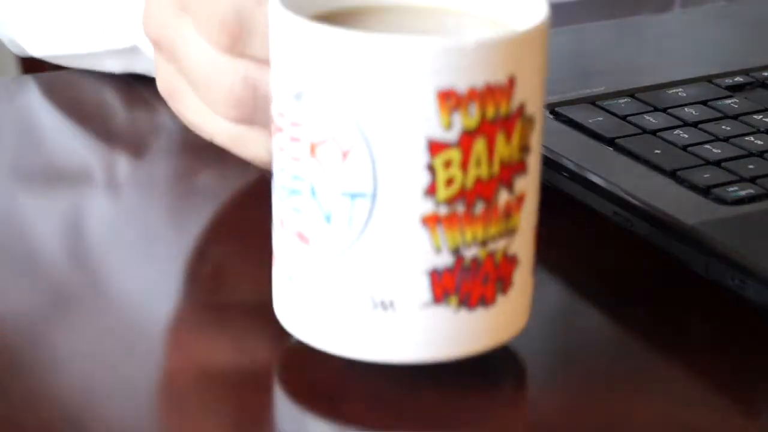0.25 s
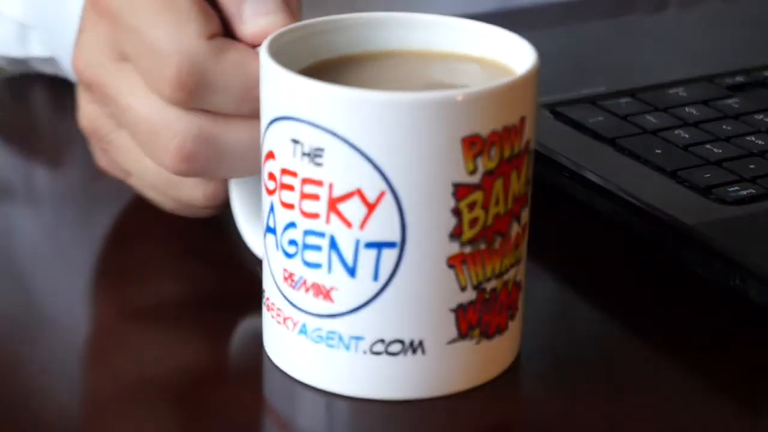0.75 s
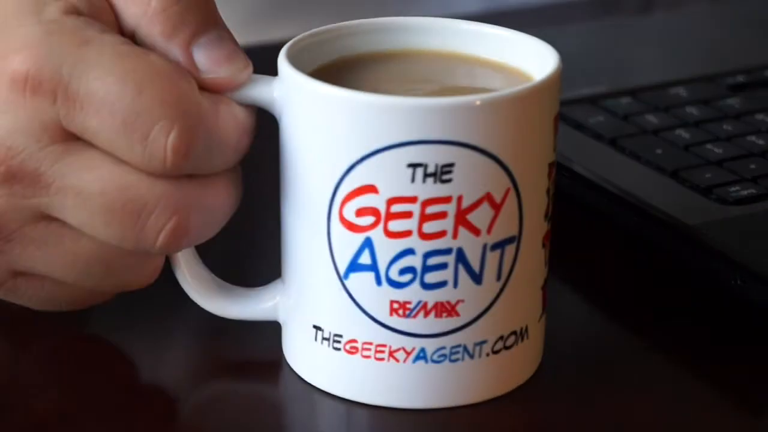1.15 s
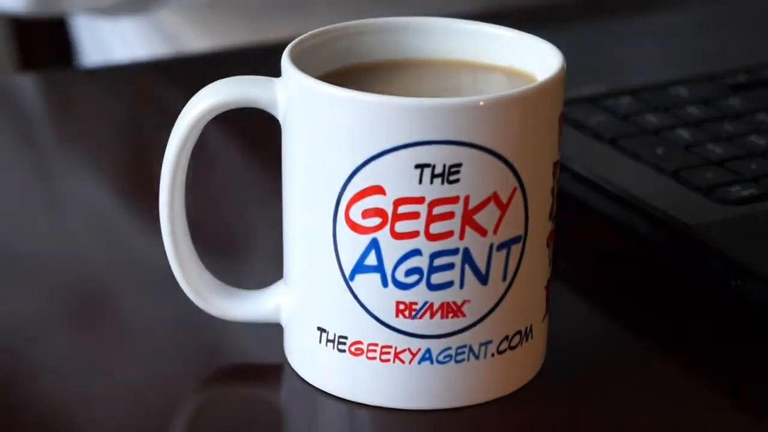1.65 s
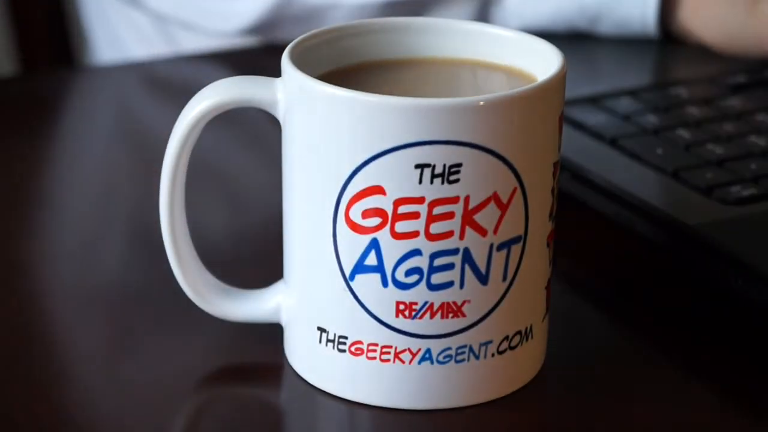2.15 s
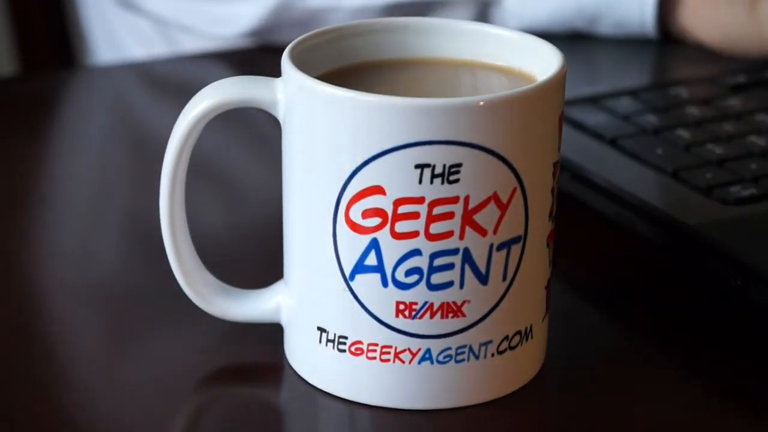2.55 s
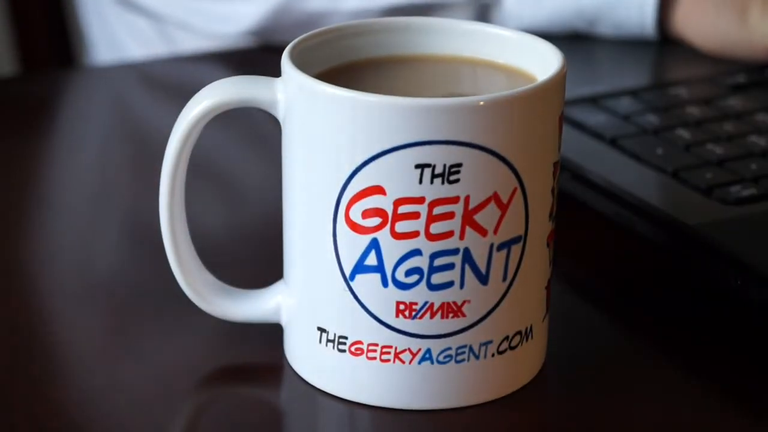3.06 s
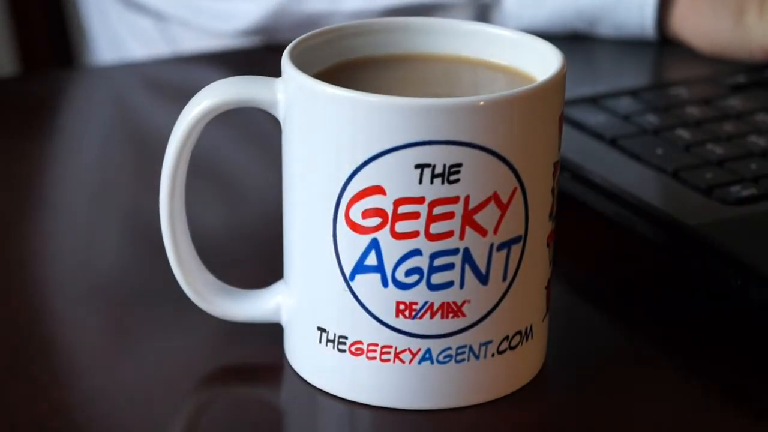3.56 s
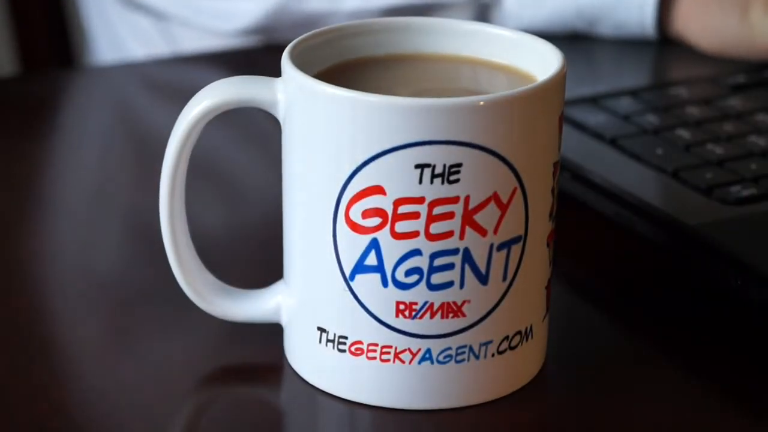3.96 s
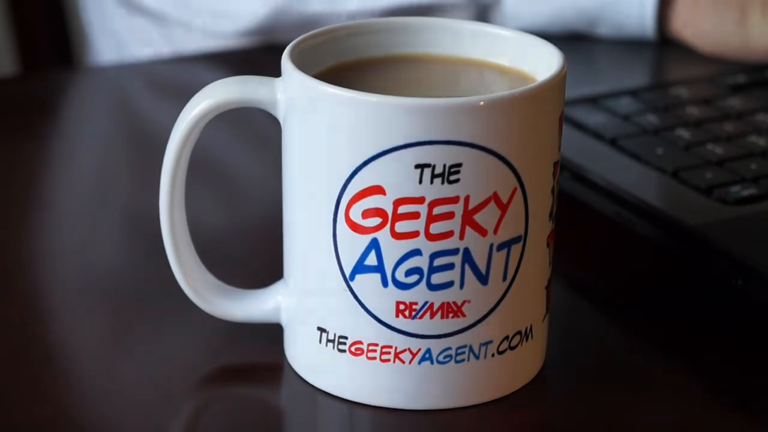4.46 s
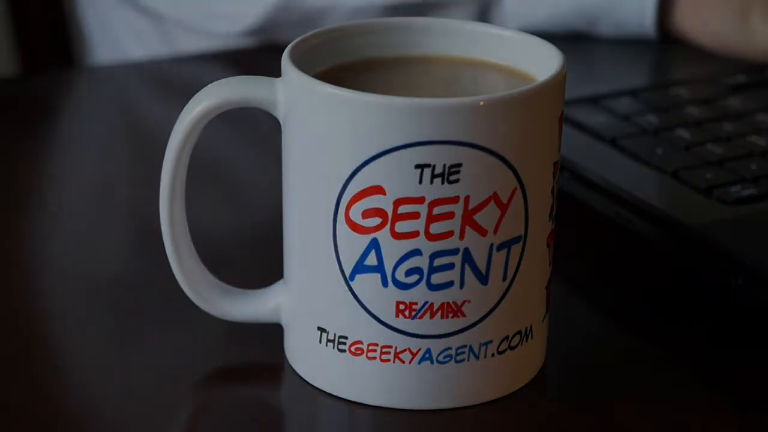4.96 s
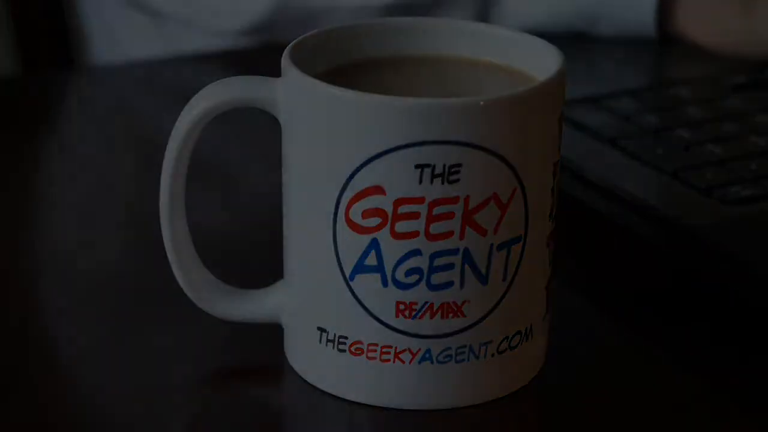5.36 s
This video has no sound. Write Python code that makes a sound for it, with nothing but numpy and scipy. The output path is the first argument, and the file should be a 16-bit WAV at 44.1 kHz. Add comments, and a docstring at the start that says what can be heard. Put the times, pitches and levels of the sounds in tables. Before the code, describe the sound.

A full ceramic mug lands hard on a wooden desk, turns with groans, scrapes and ticks, then irregular laptop typing follows over room rumble.

```python
"""A mug lands hard on a wooden desk in a bare office, then turns on its foot, groaning, scraping and ticking.
Typing follows: plastic keys click, the laptop case knocks, the desk thuds, fingertips brush the caps.
Contacts are filtered noise bursts with near echoes and a room ring; scrapes are noise under uneven swells;
desk modes and thuds are dying sines. Behind the nearly mono events lie wide rumble and hiss, and a thin whine."""
import sys
import numpy as np
from scipy import signal
from scipy.fft import rfft, irfft, next_fast_len
from scipy.io import wavfile
from scipy.ndimage import uniform_filter1d, minimum_filter1d, map_coordinates

SR = 44100
rng = np.random.default_rng(int(sys.argv[2]) if len(sys.argv) > 2 else 0)


def store_wav(level_fs):
    """Save 16-bit WAV to argv[1]."""
    pcm = np.round(np.clip(np.atleast_2d(level_fs), -1, 1) * 32767)
    wavfile.write(sys.argv[1], SR, pcm.T.astype(np.int16))


N = 247401

# Mug landing. Each row: start in seconds, relative level in dB.
LANDINGS = [(0.4078, 2)]
# Desk-top modes. Each row: frequency in Hz, relative level in dB, t60 in seconds.
DESK_MODES = [(116.5, -16, 0.94), (222, -5.5, .55), (333, -3, 0.46), (371, -5.5, 0.37), (377.5, -1, 0.51),
              (496.4, -3, 0.49), (541, -3, .32), (579, -2, 0.44), (685, -5, 0.27), (770, -1, 0.32),
              (900, -5, 0.53), (1016, -18.5, 0.69), (1223, -18, 0.76), (1260, -15, .58), (1333, -13, 0.67),
              (1583, -10, 0.3), (1587, 1.5, 0.2)]
# Spectrum of the landing blow. Each row: frequency in Hz, relative level in dB.
BLOW_SPECTRUM = [(30, -27), (60, -22.5), (200, -10), (350, -4.5), (550, -3.5), (800, -3.5), (1400, -5),
                 (2000, -10), (2800, -18), (4000, -26), (6000, -31.5), (8000, -30.5), (10500, -53),
                 (15000, -72)]
# Spectrum of ceramic meeting wood. Each row: frequency in Hz, relative level in dB.
CRACK_SPECTRUM = [(600, -22), (1800, -2), (3200, 2), (5000, -8), (8000, -15), (10000, -25), (15000, -45)]
# Spectrum of the groaning wood. Each row: frequency in Hz, relative level in dB.
GROAN_SPECTRUM = [(71, -25), (120, -10), (150, -14.5), (355, -2.5), (412, -11), (544, -3), (678, -11.5),
                  (785, -6.5), (2160, -14.5), (4000, -28.5), (5200, -54), (8800, -120)]
# Spectrum of grit under the foot. Each row: frequency in Hz, relative level in dB.
GRIT_SPECTRUM = [(1470, -42), (2500, 2), (3070, 4.5), (4280, 0), (7800, 0), (11200, -24), (13000, -77)]
# Parts of the turn. Each: start, rise and hold in seconds, t60 in seconds, relative level in dB.
GROAN_SWELL = (0.7348, 0.21, 0.4128, 0.76, -37.5)
GRIND_SWELL = (0.82, 0.12, 0.43, 0.2, -49.5)
SQUEAK_SWELL = (0.905, 0.025, 0.002, 0.22, -38)
JUDDER_SWELL = (1.2, 0.04, 0.22, 0.3, -46.5)
# Mug double ticks. Each row: start in seconds, relative level in dB, centre in Hz,
# rebound over the tick in dB, room over the contact in dB, relative grit level in dB.
MUG_TICKS = [(.1405, -30.5, 7140, -1.5, 0.5, -64), (0.9974, -19, 6740, -1, 2.5, -36),
             (1.1037, -22, 7100, 3.5, 2, -42), (1.217, -30.5, 7500, -8.5, 4, -53),
             (1.3264, -6, 7260, -8, -8.5, -51)]
# Spectrum of any small hard contact. Each row: frequency in Hz, relative level in dB.
CONTACT_SPECTRUM = [(800, -35), (1500, -12), (3000, -10.5), (4500, -6), (6000, -1), (8000, 2), (9500, -3),
                    (12000, -14), (16000, -25)]
# Keystrokes. Each row: finger landing in seconds, travel until the snap in seconds, relative snap level in dB,
# landing over the snap in dB, click centre in Hz, relative case knock level in dB, knock centre in Hz,
# relative desk thud level in dB.
KEYSTROKES = [(2.2495, .008, -20.5, -11, 5900, -61, 300, -60),
              (2.3662, .0068, -15.5, -6.5, 7640, -54, 250, -60),
              (2.6632, .010, -17.5, -13, 7000, -61, 403, -70), (2.7235, .008, -28, -9, 5900, -68, 400, -72),
              (2.906, 0.0072, -27, -14, 3530, -54, 980, -53), (2.95, .012, -25, -2, 6500, -43, 980, -43.5),
              (3.0558, .007, -29, -1, 8200, -53, 234, -42.5),
              (3.1163, 0.0089, -24.5, -1, 7050, -52.5, 605, -40),
              (3.214, .008, -29, -3, 6900, -51.5, 1650, -41),
              (3.341, .009, -19, -5, 8360, -50.5, 1540, -56),
              (3.67, .010, -19, -5.5, 9000, -46.5, 290, -45.5),
              (3.8987, .012, -23.5, 2.5, 8100, -41, 617, -45),
              (4.0215, .007, -22.5, -5.5, 8250, -44.5, 217, -49.5),
              (4.1955, 0.0091, -17, -7.5, 8500, -42.5, 298, -44.5),
              (4.3620, .015, -22, -6, 8100, -52, 990, -41), (4.576, .007, -28.5, -8, 8100, -47.5, 650, -42),
              (4.7046, 0.0078, -17, -6, 8200, -43.5, 250, -45.5),
              (4.7946, 0.0089, -19, -1.5, 7500, -44, 546, -39.5),
              (4.8867, .010, -27.5, 0.5, 8000, -49, 500, -42),
              (4.960, 0.0081, -29.5, -8, 7200, -56.5, 1080, -42.5),
              (5.032, 0.0078, -38, -4, 7890, -57, 220, -53), (5.177, .006, -34, 0.5, 6550, -60, 1200, -72),
              (5.2536, .008, -35.5, -3, 8050, -53, 220, -44),
              (5.3278, .0066, -24.5, -6, 7700, -64, 400, -66),
              (5.354, .007, -28.5, -6, 7990, -47, 260, -48),
              (5.459, 0.0071, -31.5, -6, 8100, -54.5, 294, -56)]
# Hands bump the case, no click. Each row: start in seconds, relative case knock level in dB,
# knock centre in Hz, relative desk thud level in dB.
HAND_BUMPS = [(1.725, -53, 815, -76), (2.355, -45, 252, -54), (2.447, -45, 382, -45),
              (2.51, -57, 360, -50.5), (3.16, -60, 218, -42), (3.268, -53.5, 1810, -47.5),
              (3.72, -49, 825, -52), (4.85, -53.5, 550, -45)]
# Spectrum of the hollow case. Each row: frequency in Hz, relative level in dB.
CASE_SPECTRUM = [(120, -4), (200, 1), (450, 2), (700, -6), (1050, -5), (1700, -10), (3000, -13.5),
                 (6000, -32)]
# Fingers brushing the keycaps. Each row: start in seconds, rise in seconds, relative level in dB.
CAP_BRUSHES = [(2.16, 0.032, -43.5), (2.24, 0.019, -49), (2.655, 0.021, -46), (2.895, 0.018, -51),
               (3.24, 0.04, -48.5)]
# Spectrum of the brushing. Each row: frequency in Hz, relative level in dB.
BRUSH_SPECTRUM = [(900, -11), (2000, -8.5), (3000, 2), (5000, -1.5), (7000, -1.5), (11000, -58)]
# Room decay. Each row: frequency in Hz, t60 in seconds.
ROOM_T60 = [(100, 0.77), (400, 0.56), (1200, 0.76), (2500, 0.61), (4500, 0.69), (8000, 0.49), (14000, 0.43)]
# Spectrum of the background rumble and hiss. Each row: frequency in Hz, relative level in dB.
FLOOR_SPECTRUM = [(12, -26), (20, 1.5), (74, -2), (187, -2), (285, -3), (357, -4), (485, -8.5), (825, -15),
                  (976, -17), (1370, -18.5), (1960, -23), (4940, -26), (11800, -29), (13200, -25),
                  (16000, -41)]
# Whine bands. Each row: centre in Hz, half width in Hz, rms level in dB.
WHINE_BANDS = [(7840, 140, -65), (13170, 160, -63)]
# Stereo width of things on the desk. Each row: frequency in Hz, side minus mid in dB.
DESK_WIDTH = [(60, -28), (200, -28), (400, -24), (700, -19), (1300, -14), (2400, -13), (4400, -17),
              (8000, -16), (15000, -18)]
# Stereo width of the background rumble and hiss. Each row: frequency in Hz, side minus mid in dB.
FLOOR_WIDTH_DB = [(60, -22), (110, -14.5), (200, -8.5), (380, -5), (700, 1), (1300, 2), (2400, 0.5),
                  (4400, -5.5), (8000, -11), (15000, -26)]

JUDDER_HZ, JUDDER_HALF_WIDTH_HZ = 305, 52
SQUEAK_HZ, SQUEAK_HALF_WIDTH_HZ = 5000, 910
REBOUND_S, SLIP_RISE_S, SLIP_T60_S = 0.0098, 0.004, 0.26
RATTLE_MEAN_S, RATTLE_DB = 0.012, -7.5  # loose cap after the snap
TOUCH_ROOM_DB, SNAP_ROOM_DB = 2.5, 0.5
SNAP_DRY_PER_DB = 0.25  # dB of room lost per dB of snap above -26
KNOCK_SHARE = 0.6  # share of the travel after which the case is struck
THUD_HZ, THUD_SAG_HZ_PER_DB, THUD_T60_S = 119, 1.3, 0.16  # pitch at table level -44 dB
THUD_SCATTER = 0.04  # relative standard deviation of the random pitch spread
BRUSH_HOLD_S, BRUSH_T60_S = 0.025, 0.47
CATCH_GAP_MEAN_S, CATCH_DB = 0.014, 18.5  # catches on cap edges, relative to the brush row
TOP_HZ = 16100


def mug_landing():
    """One hard blow: the foot cracks against wood, the desk modes ring, the room fills."""
    out, t = np.zeros((2, N)), np.arange(SR) / SR
    for start_s, db in LANDINGS:
        bang = strike(impulse(BLOW_SPECTRUM), t60=0.048, wet_db=6.0, near_db=-2.0, near_t60=0.082)
        crack = signal.fftconvolve(stereo(burst(t60=0.0042)), impulse(CRACK_SPECTRUM)[None], axes=1)
        modes = np.zeros(SR)
        for hz, mode_db, t60 in DESK_MODES:
            modes += amp(mode_db - 60 * t / t60) * np.sin(2 * np.pi * (hz * t + rng.random()))
        onset = 1 - np.exp(-t / 0.0083)
        add(out, start_s, amp(db + 18.5) * bang)
        add(out, start_s, amp(db + 1.5) * crack)
        add(out, start_s, amp(db - 10.0) * modes * onset)
    return out


def mug_turning():
    """The foot slips unevenly: desk modes colour a groan, grit flares at each tick, a squeak and judder pass."""
    slips = wobble(69.48)
    wood = filtered(
        rush(GROAN_SPECTRUM),
        lambda f: 1 + sum(0.76 / (1 + ((f - hz) / 9) ** 2) for hz, _, _ in DESK_MODES))
    groan = swell(*GROAN_SWELL) * amp(0.87 * slips) * unit(wood)
    grinding = swell(*GRIND_SWELL)
    for start_s, *_, grit_db in MUG_TICKS:
        grinding += swell(start_s, SLIP_RISE_S, 0, SLIP_T60_S, grit_db)
    roughness_db = 1.8 * slips + 1.9 * wobble(370) - 1.5
    grit = grinding * amp(roughness_db) * rush(GRIT_SPECTRUM)
    squeak = swell(*SQUEAK_SWELL) * narrow(SQUEAK_HZ, SQUEAK_HALF_WIDTH_HZ)
    judder = swell(*JUDDER_SWELL) * narrow(JUDDER_HZ, JUDDER_HALF_WIDTH_HZ)
    return groan + grit + amp(1.5 * slips) * (squeak + judder)


def mug_ticks():
    """The handled mug catches and slips: each tiny hard contact is a crisp snap and its rebound."""
    out = np.zeros((2, N))
    for start_s, db, hz, rebound_db, room_db, _ in MUG_TICKS:
        tilt_db = 16 * np.log2(hz / 7400)
        for delay_s, step_db in [(0, 0), (REBOUND_S, rebound_db)]:
            glaze = impulse(CONTACT_SPECTRUM, hz, lift_db=4.0, tilt_db=tilt_db, ripple_db=2.5)
            snap = strike(glaze, t60=0.002, wet_db=room_db, near_db=-2, near_t60=0.09, grain_db=3)
            add(out, start_s + delay_s, amp(db + step_db + 7.5) * snap)
    return out


def key_clicks():
    """Three plastic contacts share one cap: the finger lands, the key snaps down, the loose cap rattles."""
    out = np.zeros((2, N))
    for start_s, travel_s, db, touch_db, hz, *_ in KEYSTROKES:
        tilt_db = 9 * np.log2(hz / 7400)
        cap = impulse(CONTACT_SPECTRUM, hz, lift_db=1, tilt_db=tilt_db, ripple_db=2.5)
        snap_room_db = SNAP_ROOM_DB - SNAP_DRY_PER_DB * (db + 26)
        rattle_s = travel_s + RATTLE_MEAN_S * (0.5 + rng.random())
        contacts = [
            (0, touch_db, TOUCH_ROOM_DB),
            (travel_s, 0, snap_room_db),
            (rattle_s, RATTLE_DB, SNAP_ROOM_DB)]
        for delay_s, step_db, room_db in contacts:
            click = strike(cap, t60=0.0096, wet_db=room_db, near_db=0.5, near_t60=0.13, grain_db=3.0)
            add(out, start_s + delay_s, amp(db + step_db + 8.3) * click)
    return out


def key_presses():
    """A key or hand knocks the hollow case, which sets off a low desk thud, deeper when louder."""
    out, t = np.zeros((2, N)), np.arange(SR // 2) / SR
    strokes = [(s + KNOCK_SHARE * travel_s, *blow) for s, travel_s, _, _, _, *blow in KEYSTROKES]
    thud_gain = amp(-60 * t / THUD_T60_S) * (1 - np.exp(-t / 0.0071))
    for start_s, knock_db, knock_hz, thud_db in strokes + HAND_BUMPS:
        case = impulse(CASE_SPECTRUM, knock_hz, lift_db=9.5, ripple_db=2)
        knock = strike(case, t60=0.036, wet_db=3, near_db=-1, near_t60=0.32)
        add(out, start_s, amp(knock_db + 29.5) * knock)
        mean_hz = THUD_HZ - THUD_SAG_HZ_PER_DB * (thud_db + 44)
        thud_hz = mean_hz * (1 + THUD_SCATTER * rng.normal())
        thud = thud_gain * np.sin(2 * np.pi * thud_hz * t)
        add(out, start_s, amp(thud_db + 14) * thud)
    return out


def finger_brushes():
    """Fingertips slide over the caps: a grainy noise swell with four catches on their edges."""
    pressure = sum(swell(s, rise_s, BRUSH_HOLD_S, BRUSH_T60_S, db) for s, rise_s, db in CAP_BRUSHES)
    out = pressure * amp(2.6 * wobble(250)) * rush(BRUSH_SPECTRUM)
    for start_s, _, db in CAP_BRUSHES:
        for delay_s in np.cumsum(CATCH_GAP_MEAN_S * (0.5 + rng.random(size=4))):
            edge = impulse(CONTACT_SPECTRUM, 5600, lift_db=2.5, tilt_db=-5, ripple_db=2.5)
            catch = strike(edge, t60=0.008, wet_db=-1, near_db=0, near_t60=0.14, grain_db=1.0)
            add(out, start_s + delay_s, amp(db + CATCH_DB) * catch)
    return out


def background():
    """Wide rumble and hiss drift slightly in level under narrow bands of electronic whine."""
    whine = sum(amp(db) * narrow(hz, half_width_hz) for hz, half_width_hz, db in WHINE_BANDS)
    drift_db = 0.6 * wobble(5)
    return amp(-45.0 + drift_db) * rush(FLOOR_SPECTRUM, FLOOR_WIDTH_DB) + whine


def strike(body, t60, wet_db, near_db, near_t60, grain_db=0):
    """A contact through a body: short crackle, a flurry of rattles and near echoes, the room's long ring."""
    near = burst(near_t60, grain_db)
    hz, t, bands = signal.stft(rng.standard_normal(near.shape), SR, nperseg=256)
    decay = amp(-60 * t / along(ROOM_T60, hz)[:, None])
    ring = signal.istft(bands * decay, SR, nperseg=256)[1][:, :near.shape[1]]
    ring = ring * (1 - np.exp(-np.arange(ring.shape[1]) / SR / 0.0035))
    echo = amp(wet_db) * (ring / np.linalg.norm(ring[0]) + amp(near_db) * near)
    return signal.fftconvolve(stereo(burst(t60) + echo), body[None], axes=1)


def burst(t60, grain_db=0):
    """Two dying noises, the first of energy 1, clumped into millisecond grains."""
    t = np.arange(SR * 3 // 4) / SR
    grains = np.interp(t, np.linspace(0, 1, num=1000), rng.standard_normal(1000))
    x = rng.standard_normal((2, len(t))) * amp(grain_db * grains - 60 * t / t60)
    return x / np.linalg.norm(x[0])


def impulse(spectrum, centre_hz=1000, lift_db=0, tilt_db=0, ripple_db=0, size=4096):
    """Minimum-phase body response of energy 1: a spectrum lifted at a centre, tilted, with chance resonances."""
    hz = np.fft.rfftfreq(size, 1 / SR)
    octaves = np.log2(np.maximum(hz, 20) / centre_hz)
    ripple = ripple_db * unit(map_coordinates(rng.standard_normal(size), [hz / 170]))
    lift = lift_db * np.exp(-(octaves / 0.28) ** 2)
    tilt = tilt_db * np.clip(octaves, -1, 1)
    level_db = along(spectrum, hz) + lift + tilt + ripple
    # folding the cepstrum makes the response causal
    cepstrum = irfft(np.log(amp(level_db)))
    cepstrum[1:size // 2] *= 2
    cepstrum[size // 2 + 1:] = 0
    h = irfft(np.exp(rfft(cepstrum)))
    return h / np.linalg.norm(h)


def rush(spectrum, width=DESK_WIDTH):
    """Coloured stereo noise of rms 1."""
    noise = stereo(rng.standard_normal((2, N)), width)
    return unit(filtered(noise, lambda hz: amp(along(spectrum, hz))))


def narrow(hz, half_width_hz):
    """Stereo noise of rms 1 in one narrow resonance."""
    noise = stereo(rng.standard_normal((2, N)))
    return unit(filtered(noise, lambda f: 1 / (1 + ((f - hz) / half_width_hz) ** 2)))


def stereo(pair, width=DESK_WIDTH):
    """Two unrelated signals become the mid and side of a stereo pair."""
    mid, side = pair[0], filtered(pair[1], lambda hz: amp(along(width, hz)))
    return np.array([mid + side, mid - side])


def swell(start_s, rise_s, hold_s, t60, db):
    """Gain of a sound that rises, holds and dies away."""
    t = np.arange(N) / SR - start_s
    fall_db = 60 * np.maximum(t - rise_s - hold_s, 0) / t60
    return np.clip(t / rise_s, 0, 1) * amp(db - fall_db)


def wobble(rate_hz):
    """A smooth random curve through rate_hz knots a second."""
    knots = rng.standard_normal(int(N * rate_hz / SR) + 4)
    return map_coordinates(knots, [np.arange(N) * rate_hz / SR])


def filtered(x, response):
    """x through a zero-phase response of frequency in Hz."""
    n = x.shape[-1]
    m = next_fast_len(n + 8192)
    return irfft(rfft(x, m) * response(np.fft.rfftfreq(m, 1 / SR)), m)[..., :n]


def along(points, hz):
    """(Hz, value) points read on a log frequency axis."""
    f, v = np.transpose(points)
    return np.interp(np.log(hz + 1), np.log(f + 1), v)


def unit(x):
    """Scales x to rms 1."""
    return x / np.sqrt(np.mean(x ** 2) + 1e-20)


def amp(db):
    """Decibels to gain."""
    return 10 ** (np.asarray(db) / 20)


def add(out, start_s, x):
    """Mixes x into out from start_s."""
    i = max(round(start_s * SR), 0)
    n = min(x.shape[-1], N - i)
    out[:, i:i + n] += x[..., :n]


def scene():
    """Mug and keyboard straight ahead, over the background."""
    mug = mug_landing() + mug_turning() + mug_ticks()
    typing = key_clicks() + key_presses() + finger_brushes()
    return mug + typing + background()


def record(dry):
    """Gain control ducks on loud sound and recovers slowly; peaks round off at full scale; the top is cut."""
    power = np.abs(uniform_filter1d(np.mean(dry ** 2, axis=0), size=900))
    over_db = np.maximum(10 * np.log10(power + 1e-12) + 9.2, 0)
    recovery_db = 11 * np.arange(N) / SR  # 11 dB per second
    duck_db = np.maximum.accumulate(over_db + recovery_db) - recovery_db
    gain = uniform_filter1d(minimum_filter1d(amp(-duck_db), size=900), size=300)
    held = dry * gain
    rounded = held / (1 + np.abs(held) ** 8) ** (1 / 8)
    return filtered(rounded, lambda hz: hz < TOP_HZ)


dry = scene()
out = record(dry)
store_wav(out)
```